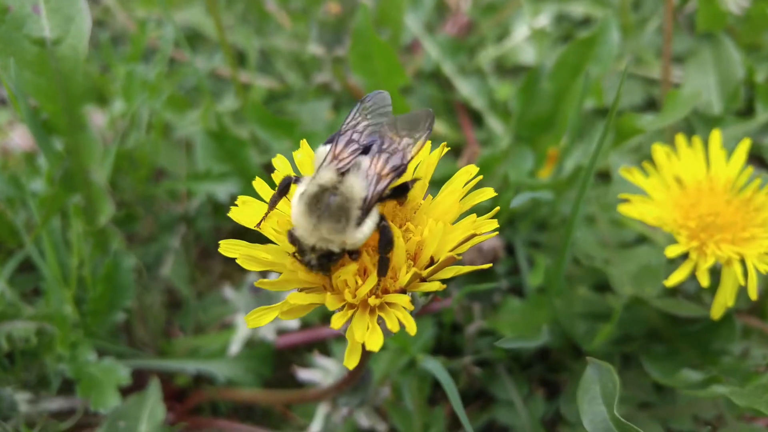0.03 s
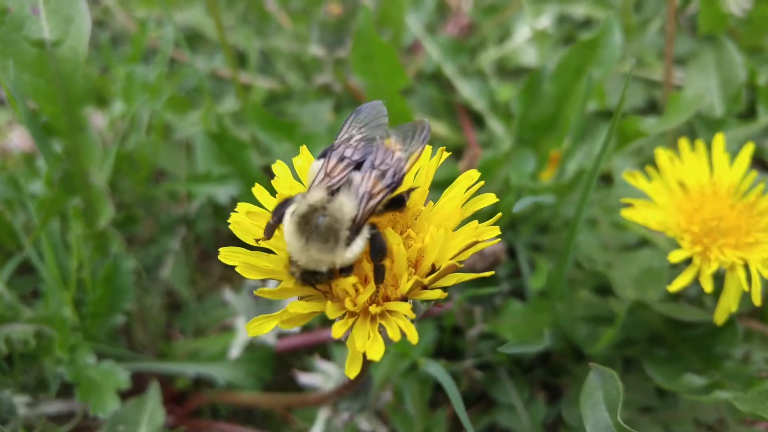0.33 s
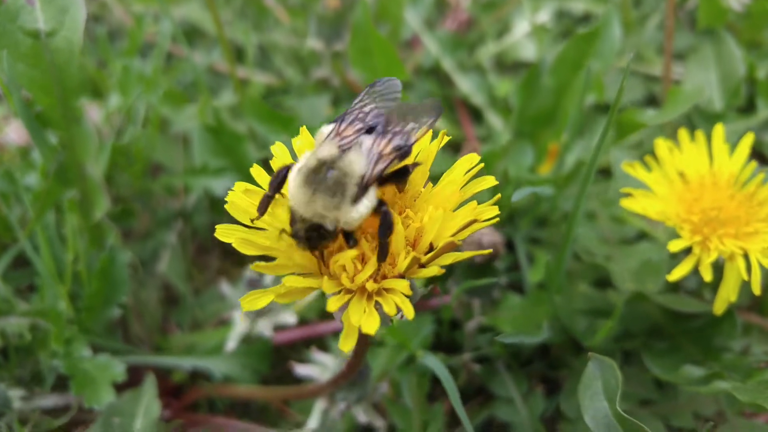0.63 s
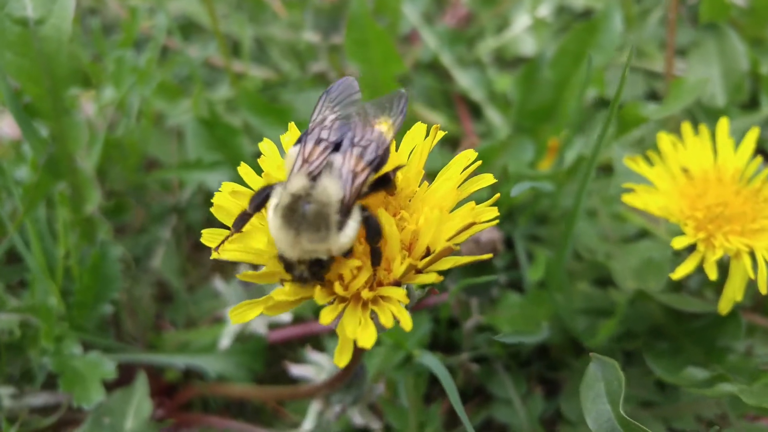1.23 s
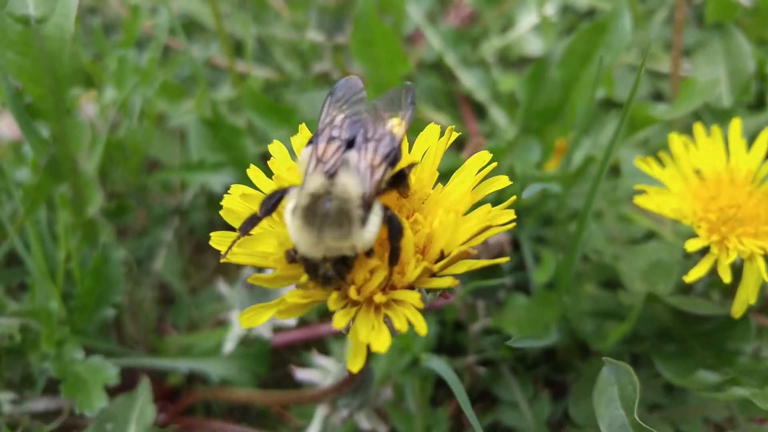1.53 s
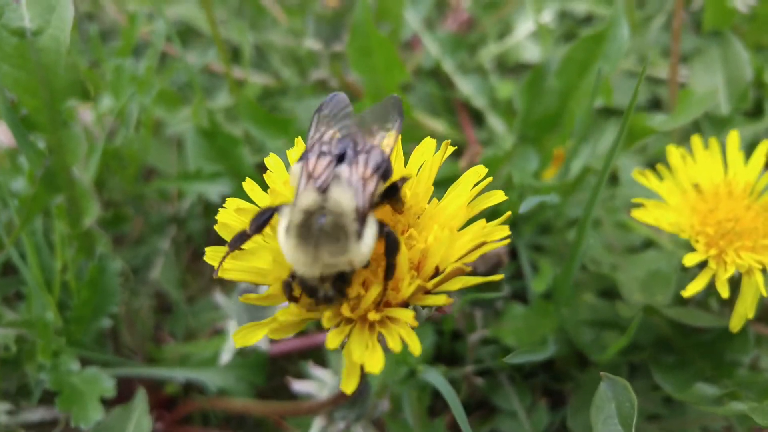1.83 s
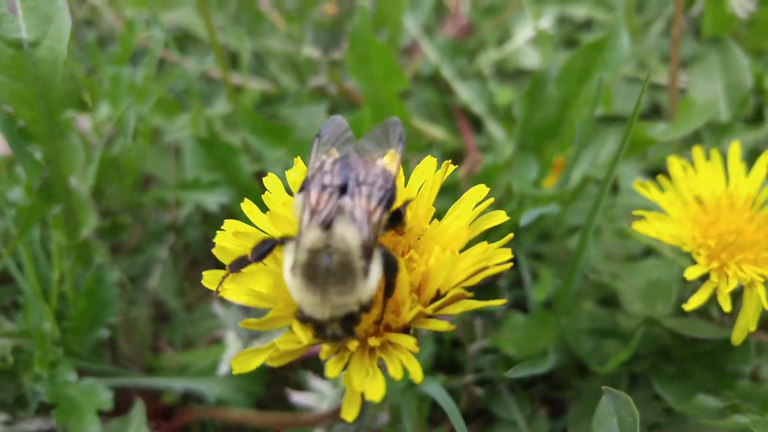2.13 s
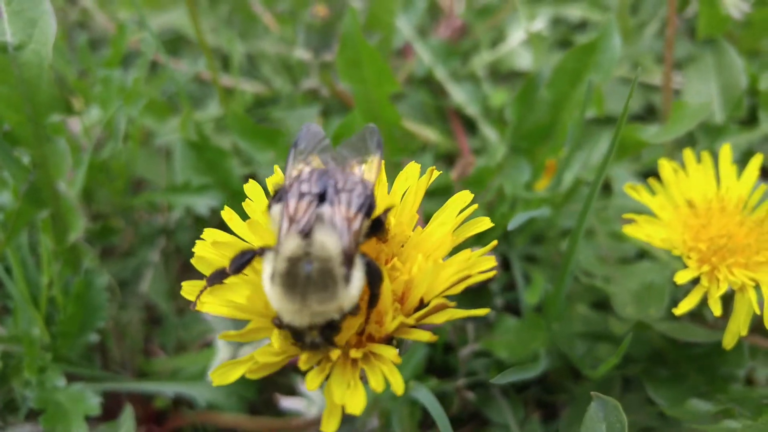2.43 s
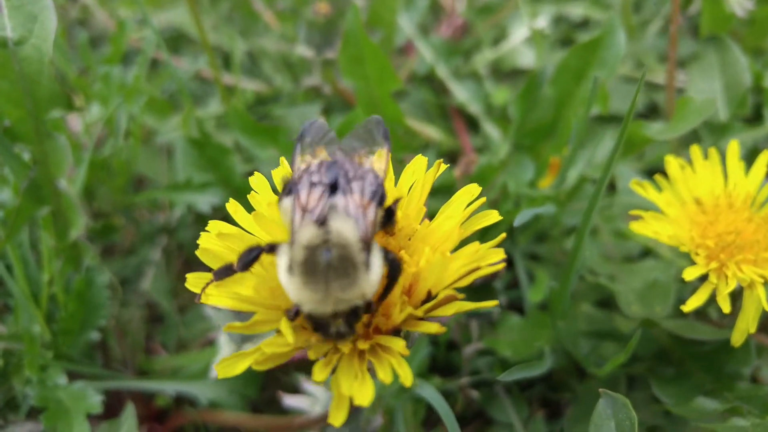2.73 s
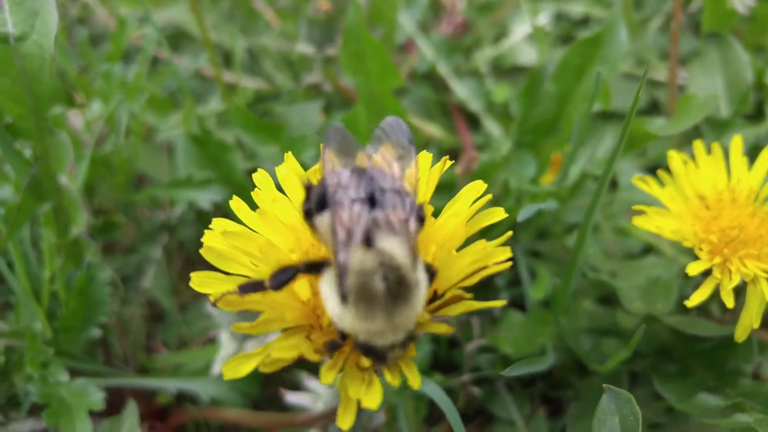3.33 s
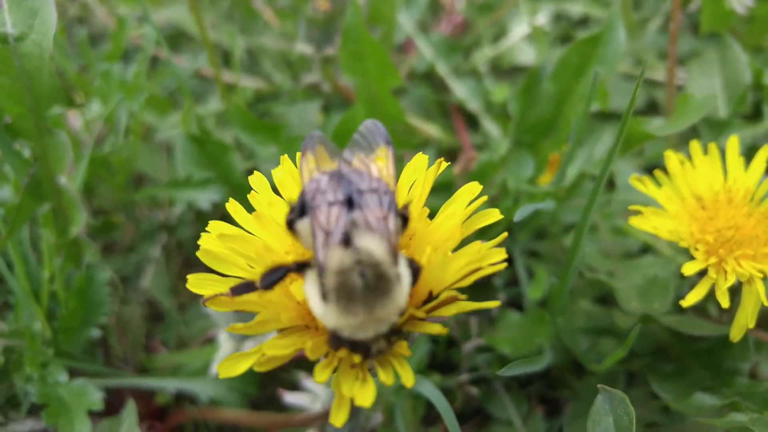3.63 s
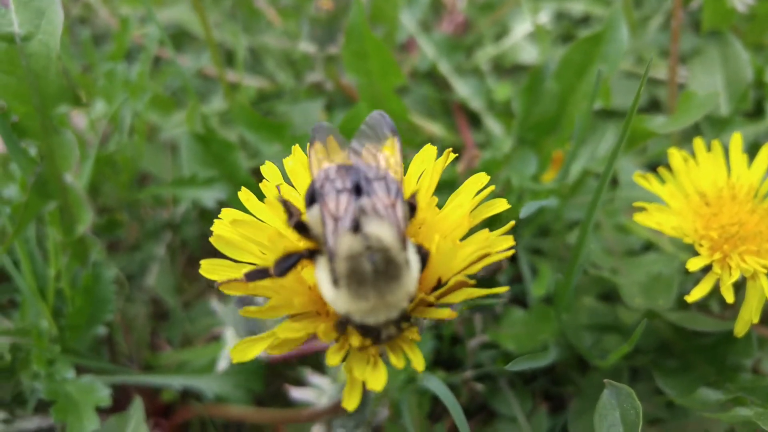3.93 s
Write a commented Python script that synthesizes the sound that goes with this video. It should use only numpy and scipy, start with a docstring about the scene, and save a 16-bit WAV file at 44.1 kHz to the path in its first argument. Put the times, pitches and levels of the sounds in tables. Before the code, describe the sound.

A low swelling hum with light meadow wind, faint birds and one sharp microphone bump.

```python
"""A low hum, probably the housing of a hand-held camera, swells about three times a second.
The camera is just above the grass of a quiet meadow in light wind; a soft rush swells with the hum.
Behind it sit still air, a thin drone, a few soft hoots and small birds whistling far off.
Late on, one sharp bump of pressure hits the right microphone, and a brief rustle follows."""
import sys
import numpy as np
from scipy import signal
from scipy.fft import rfft, irfft
from scipy.io import wavfile

SR = 44100
rng = np.random.default_rng(int(sys.argv[2]) if len(sys.argv) > 2 else 0)


def int16_out(signal):
    """Quantize to a 16-bit WAV file."""
    q = np.round(np.clip(np.atleast_2d(signal).T, -1, 1) * 32767)
    wavfile.write(sys.argv[1], SR, q.astype(np.int16))


N = 176400
LEAD_S = np.array([[0.00042], [0]])  # the left microphone hears first


def undb(db):
    """Decibels to gain."""
    return 10 ** (np.asarray(db) / 20)


def clock():
    """Time of each sample."""
    return np.arange(N) / SR


def freqs():
    """Frequency of each spectral bin, kept above zero."""
    return np.maximum(np.arange(N // 2 + 1) * SR / N, SR / N)


def unit(x):
    """Scale to an rms of 1."""
    return x / np.sqrt(np.mean(x ** 2))


def colour(points):
    """EQ curve: gain per bin from (frequency [Hz], level [dB]) points."""
    hz, db = np.array(points, float).T
    return undb(np.interp(np.log(freqs()), np.log(hz), db))


def band(hz, width_hz):
    """Response of a resonance, gain 1 at its centre."""
    f = freqs()
    return 1 / (1 + 1j * (f * f - hz * hz) / (f * width_hz))


def noise(response):
    """Unrelated left and right noise, shaped by the response, with an rms of 1."""
    return unit(irfft(rfft(rng.standard_normal((2, N))) * response, N))


def walk(rate_hz):
    """Smooth random modulation with an rms of 1, rolling off around rate_hz."""
    return unit(irfft(rfft(rng.standard_normal(N)) / (1 + (freqs() / rate_hz) ** 2) ** 2, N))


def sides(left_db):
    """Channel gains with the left one offset."""
    return np.array([[undb(left_db)], [1]])


def flicker(x):
    """Let the level of each octave of a noise waver on its own."""
    octave = np.clip(np.log2(freqs() / 100), 0, 7)
    spectrum = rfft(x)
    bands = (irfft(spectrum * np.maximum(1 - np.abs(octave - k), 0), N) for k in range(8))
    return sum(part * undb(1.44 * walk(14)) for part in bands)


def wind(drive):
    """A soft rush that follows the swells loosely, over a steady bed of air."""
    # tone of still air and distance (frequency [Hz], relative level [dB])
    air_eq = [(25, -16), (60, 2), (150, 8), (260, 2.5), (420, -3.5), (520, -5.5), (700, -3), (1080, -8.5),
              (1350, -18.5), (2800, -20.5), (4800, -25.5), (7000, -28.5), (10000, -31.5), (13000, -30.5),
              (16000, -38.5)]
    # tone of the rush (frequency [Hz], relative level [dB])
    rush_eq = [(25, -27), (45, 1), (90, 11), (170, 9), (260, 3.5), (400, -21), (520, -10.5), (600, 1.5),
               (700, -2), (850, -2.5), (1080, -10.5), (1350, -17.5), (2500, -17), (3500, -22),
               (4600, -26.5), (6800, -26), (7800, -22.5), (8500, -21), (10500, -27), (13000, -25),
               (16000, -27)]
    # stereo lean of both noises (frequency [Hz], right over left [dB])
    lean_eq = [(30, 12), (60, 2.5), (120, 10), (250, 0.5), (500, -4.5), (1200, 0), (2400, 4.5), (4000, 5.5),
               (6000, -1), (8500, 1.5), (15000, -1.5)]
    lean = colour(lean_eq) ** np.array([[-.5], [.5]])
    smooth_s, follow, common_share = .2, 0.49, 0.18
    slow_drive = np.abs(irfft(rfft(drive) * np.exp(-(freqs() * smooth_s) ** 2), N))
    rush = noise(colour(rush_eq) * lean) * slow_drive ** follow * undb(-58.5)
    air_tone = colour(air_eq) * lean
    lead = np.exp(2j * np.pi * freqs() * LEAD_S)
    common = unit(irfft(rfft(rng.standard_normal(N)) * air_tone * lead, N))  # reaches both microphones
    air = np.sqrt(common_share) * common + np.sqrt(1 - common_share) * noise(air_tone)
    return flicker(rush + air * undb(-63))


def birds():
    """Thin gliding whistles, blurred by echoes from distant trees."""
    # bird calls (start [s], length [s], first pitch [Hz], middle pitch [Hz], last pitch [Hz], level [dB])
    whistles = [(.09, .1, 7100, 7300, 7130, -83), (.19, 0.048, 3350, 3470, 3360, -75.5),
                (0.416, 0.033, 5700, 6140, 6600, -82), (1.178, 0.055, 4270, 4270, 4230, -70.5),
                (2.323, .10, 5100, 6130, 6850, -73.5), (2.317, 0.031, 6900, 6350, 6200, -72.5),
                (2.341, 0.18, 4610, 4930, 5560, -81.5), (2.418, 0.065, 6200, 6290, 6650, -75.5),
                (2.52, 0.11, 6800, 6900, 6950, -88), (2.53, 0.17, 5500, 5980, 6880, -76.5),
                (2.506, 0.1, 4040, 4070, 4040, -78.5), (2.582, 0.053, 4900, 4570, 4600, -79),
                (2.638, 0.17, 4230, 4290, 4520, -77.5), (2.808, .09, 3060, 3050, 3070, -84),
                (2.898, 0.07, 3460, 3780, 4570, -78.5), (2.815, 0.19, 4400, 4460, 4470, -86),
                (2.989, 0.042, 3300, 3220, 3020, -76)]
    t, song = clock(), np.zeros(N)
    waver = 1 + .008 * walk(150)
    for start, length, first, middle, last, db in whistles:
        progress = np.clip((t - start) / length, 0, 1)
        glide = np.polyfit([0, .5, 1], [first, middle, last], 2)
        hz = np.polyval(glide, progress) * waver
        envelope = np.abs(np.sin(np.pi * progress)) ** 0.95
        song += undb(db) * envelope * np.sin(2 * np.pi * np.cumsum(hz) / SR)
    t60_s, echo_db = 0.38, 2
    trees = unit(rng.standard_normal((2, N)) * np.exp(-np.log(1000) * t / t60_s)) / np.sqrt(N)
    echo = irfft(rfft(song) * rfft(trees), N)
    return (song + undb(echo_db) * echo) * sides(left_db=-1.5)


def rustle():
    """A short, high brush in the grass that rises softly and fades."""
    # tone of the grass (frequency [Hz], relative level [dB])
    grass_eq = [(1500, -29), (5800, -15), (6900, -6), (8200, -2), (9800, -4), (11000, -17), (16000, -24)]
    start_s, rise_s = 3.315, .055
    age = np.maximum(clock() - start_s, 0) / rise_s
    envelope = age * np.exp(1 - age)
    return noise(colour(grass_eq)) * envelope * undb(-69 + 1.8 * walk(120)) * sides(left_db=-4.5)


def hoots():
    """Brief, slightly unsteady low tones, dead centre."""
    # soft hoots (peak time [s], half-width [s], pitch [Hz], level [dB])
    notes = [(.23, 0.045, 712, -64), (.62, .1, 301, -62), (1.0, 0.056, 302, -59.5), (1.451, 0.09, 704, -64),
             (2.07, 0.022, 298, -65), (2.18, 0.028, 208, -56.5), (3.97, 0.03, 302, -57.5),
             (3.975, .03, 358, -60.5)]
    out = np.zeros(N)
    for at, width, hz, db in notes:
        envelope = np.exp(-((clock() - at) / width) ** 2)
        turns = np.cumsum(hz * (1 + 0.029 * walk(65))) / SR
        out += undb(db) * envelope * np.sin(2 * np.pi * turns)
    return out


def drone():
    """A thin, wavering low tone that dips halfway through."""
    # fader ride of the drone (time [s], level [dB])
    fader = [(0, -61), (.6, -55.5), (1.2, -52), (1.75, -54), (2.0, -62), (3.3, -59.5), (4, -57.5)]
    pitch_hz, waver_db = 136, 2
    turns = np.cumsum(pitch_hz * (1 + .012 * walk(15))) / SR
    db = np.interp(clock(), *np.array(fader).T) + waver_db * walk(15)
    return undb(db) * np.sin(2 * np.pi * turns) * sides(left_db=-9)


def hiss_tail(at_s):
    """A faint, brief hiss fading after the bump."""
    # tone of the hiss (frequency [Hz], relative level [dB])
    hiss_eq = [(100, 5.5), (700, -5), (1500, -11), (3000, -15), (6000, -23), (12000, -22.5), (16000, -28)]
    attack_s, decay_s = 0.0033, 0.024
    t = clock() - at_s
    envelope = np.clip(t / attack_s, 0, 1) * np.exp(-np.abs(t) / decay_s)
    return noise(colour(hiss_eq)) * envelope * undb(-48)


def bump(at_s):
    """Pressure on the right microphone builds, snaps over and leaks away: a hollow ring, then a thump."""
    build_s, leak_s = 0.00039, .02
    thump_hz, thump_width_hz, top_hz = 56.6, 37.2, 13500
    t = clock() - at_s
    pressure = np.where(t < 0, -0.86 * np.exp(-np.abs(t) / build_s), np.exp(-np.abs(t) / leak_s))
    thump = (band(thump_hz, thump_width_hz) * 1j * freqs() / thump_width_hz) ** 2  # resonant high-pass
    port = 1 + undb(11.5) * band(hz=584, width_hz=228)
    hollow = 1 - band(hz=502, width_hz=218)
    rolloff = 1 / (1 + 1j * freqs() / top_hz)
    snap = irfft(rfft(pressure) * thump * port * hollow * rolloff, N)
    return undb(-9.5) * snap * sides(left_db=-44)


def swell():
    """The envelope that drives hum and rush: rounded swells over a low floor."""
    # swells of the rumble (peak time [s], half-width [s], level [dB])
    swells = [(.085, .03, -28), (.22, 0.077, 0), (0.599, 0.082, -1), (.715, 0.077, -5.5),
              (0.953, 0.074, 1.5), (1.07, 0.053, -10.5), (1.304, 0.097, 3.5), (1.47, 0.019, -21),
              (1.632, 0.1, -2.5), (1.96, 0.018, -16), (2.061, .045, -4.5), (2.15, 0.041, -13),
              (2.338, 0.031, -5), (2.45, 0.034, -13), (2.56, 0.03, -48), (2.67, 0.041, -12.5),
              (2.83, 0.059, -17), (2.93, 0.038, -5), (3.09, 0.053, -1.5), (3.22, 0.052, -12),
              (3.385, 0.072, 1), (3.49, 0.051, -1), (3.692, 0.087, 4.5), (3.97, 0.084, -2.5)]
    t, floor_db = clock(), -28.5
    return sum(undb(db) * np.exp(-((t - at) / width) ** 2) for at, width, db in swells) + undb(floor_db)


def housing(drive):
    """The housing resonates: one clear low hum and several weak, narrow rings, rising with the swells."""
    # drift of the hum (time [s], pitch [Hz])
    hum_pitch = [(0, 99.7), (0.598, 98.2), (1.298, 97.4), (2.1, 97.36), (3.0, 95.5), (3.45, 95.97),
                 (3.7, 96.86), (4, 95.8)]
    # weaker rings of the housing, with levels at a drive of 1
    # (pitch [Hz], width [Hz], right level [dB], left level [dB], swell following [exponent])
    rings = [(54, 6.8, -62, -75, .7), (200.6, 5.2, -64, -67.5, 0.33), (299, 4.1, -67, -66.5, 0.43),
             (359, 9, -66, -91, 0.55), (400, 10, -79.5, -69.5, 0.27), (466.8, 19, -75, -78, 0.18),
             (708.7, 29.6, -68.5, -72.5, 0.28)]
    hum_db, waver_db = -40, 1.06
    hz = np.interp(clock(), *np.array(hum_pitch).T) * (1 + 0.0046 * walk(24))
    turns = np.cumsum(hz) / SR + hz * LEAD_S
    hum = np.sin(2 * np.pi * turns) * drive * undb(hum_db + waver_db * walk(37))
    out = hum * sides(left_db=-13)
    for ring_hz, width, right_db, left_db, follow in rings:
        ring = noise(band(ring_hz, 2 * width) ** 2)
        out += ring * undb([[left_db], [right_db]]) * drive ** follow
    return out


def scene():
    """Everything that reaches the two microphones."""
    drive, bump_s = swell(), 3.12984
    ambience = housing(drive) + wind(drive) + drone() + hoots() + birds()
    return ambience + bump(bump_s) + hiss_tail(bump_s) + rustle()


def record(dry):
    """The camera cuts the top end with a steep low-pass."""
    top_hz = 16200
    return signal.sosfilt(signal.ellip(10, .2, 70, top_hz, fs=SR, output="sos"), dry)


dry = scene()
out = record(dry)
int16_out(out)
```